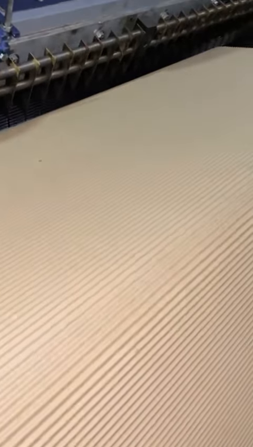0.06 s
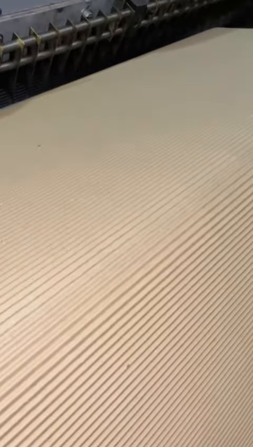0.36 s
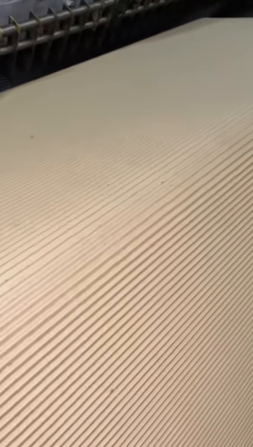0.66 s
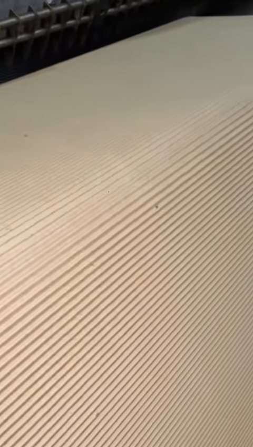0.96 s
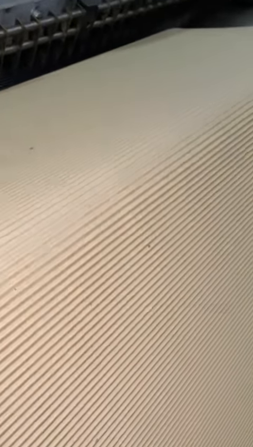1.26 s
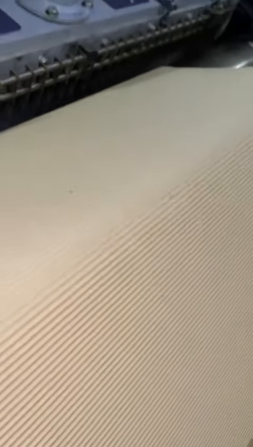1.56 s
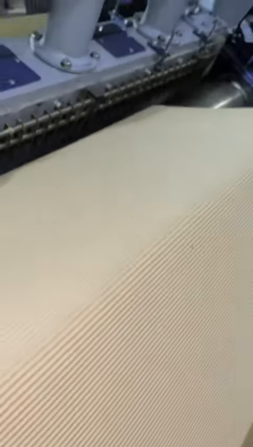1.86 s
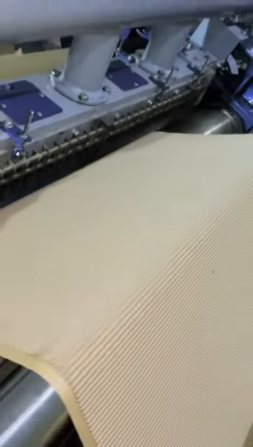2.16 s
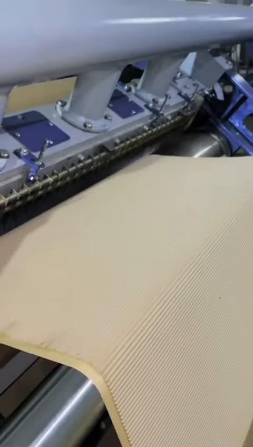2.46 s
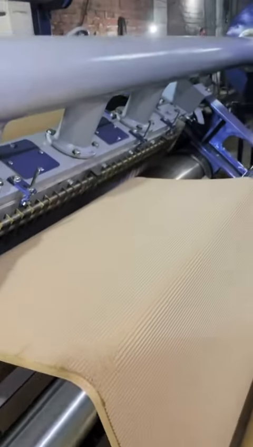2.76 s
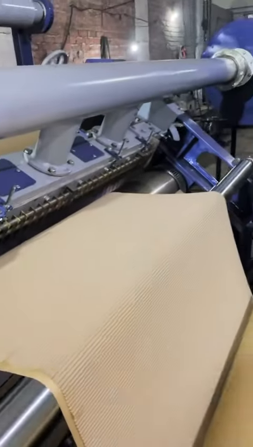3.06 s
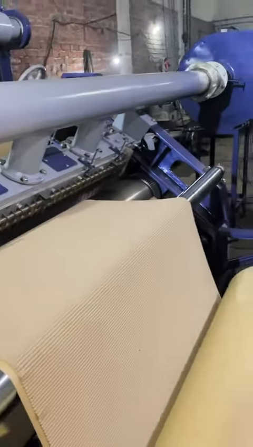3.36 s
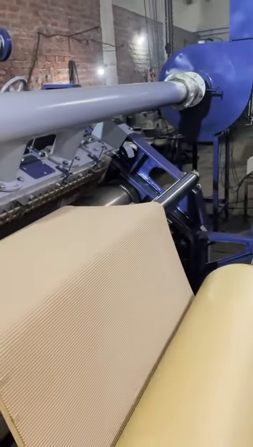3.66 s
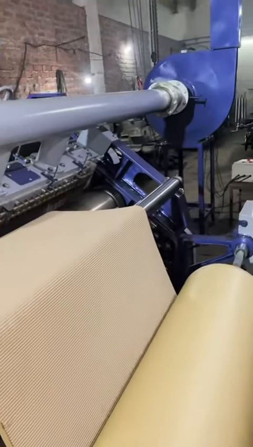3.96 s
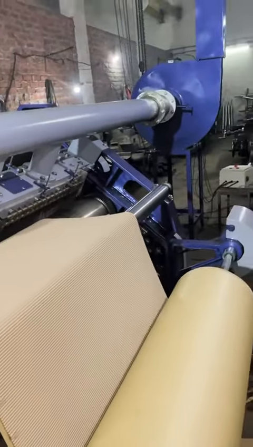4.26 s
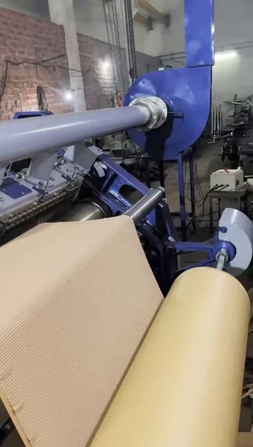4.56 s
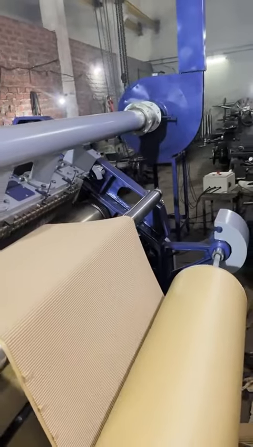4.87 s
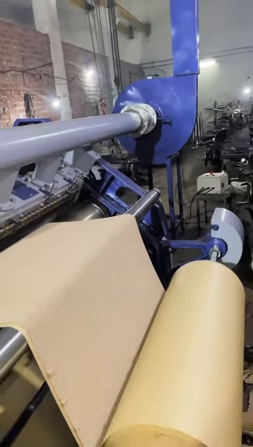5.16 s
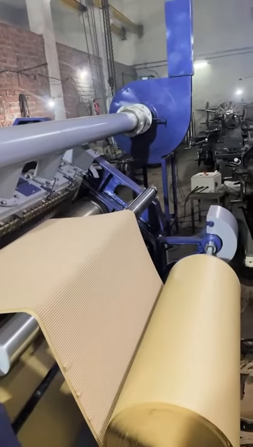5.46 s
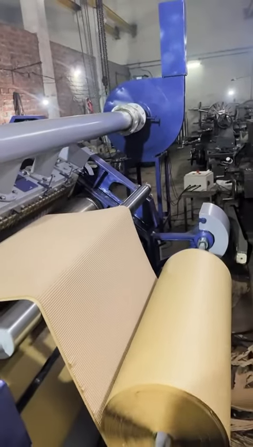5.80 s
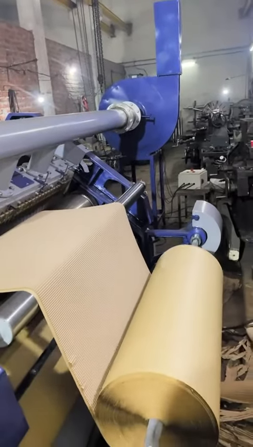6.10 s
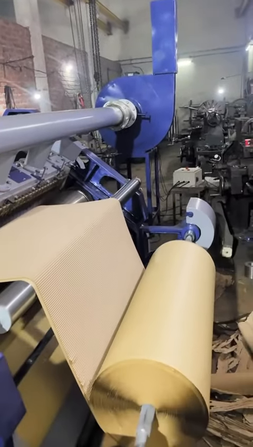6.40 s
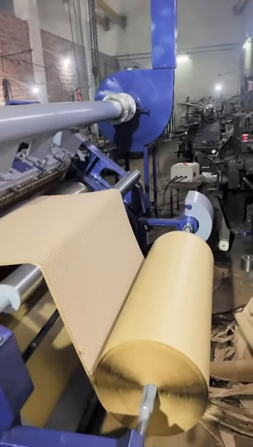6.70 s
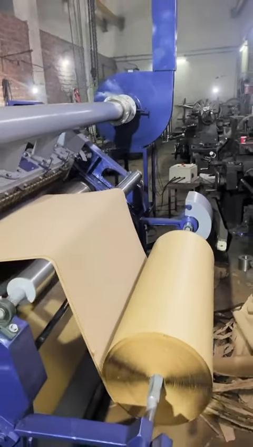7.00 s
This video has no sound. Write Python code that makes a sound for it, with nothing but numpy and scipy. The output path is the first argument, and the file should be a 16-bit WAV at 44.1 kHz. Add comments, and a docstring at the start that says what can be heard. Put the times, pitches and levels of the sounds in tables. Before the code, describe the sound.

A paper corrugating machine runs steadily, with hissing air and rapid high chirps over a rumbling frame, churning gears and motor hum.

```python
"""A paper corrugator runs in a workshop. From the start, air hisses through its suction slots, with a
dipping chirp each time a flute (a ridge on the roll) passes, 19 a second. The paper scrapes now and
then, over a rumbling frame, churning gears and a humming motor. After about 1.5 seconds the microphone
backs away: the hiss and chirps soften, and the suction blower's thin tone swells. In the last second
the microphone comes a little closer again."""
import sys
import numpy as np
from scipy.fft import rfft, irfft, next_fast_len
from scipy.io import wavfile
from scipy.ndimage import uniform_filter1d, map_coordinates

SR = 44100
rng = np.random.default_rng(int(sys.argv[2]) if len(sys.argv) > 2 else 0)


def generate_wav(sig):
    """Save sig (samples, or channels by samples) to the path in sys.argv[1] as 16-bit PCM at SR."""
    pcm = np.round(np.clip(np.atleast_2d(sig).T, -1, 1) * 32767).astype(np.int16)
    wavfile.write(sys.argv[1], SR, pcm)


N = 314874

# How far the microphone is from the rolls. Each row: time in seconds, distance in metres.
MIC_DISTANCE = [(0, 0.6), (1.45, 0.65), (2.3, 1.06), (3.4, 1.37), (4.8, 1.56), (6.2, 1.63), (7.14, 1.38)]
# The blower's tone swells where the machine does not block it. Each row: time in seconds, level in dB.
BLOWER_LEVEL = [(0, -53.5), (1.5, -58.5), (1.75, -46), (2.5, -45), (2.95, -45.5), (3.15, -53), (3.4, -49),
                (3.95, -53.5), (4.6, -53.5), (5.1, -52.5), (5.7, -49.5), (6.45, -52), (6.95, -46.5)]

SEALED_AT = .64  # how far through its cycle a flute seals the slot
# Sounds have two rows: what arrives straight from the source, and what fills the hall.
DIRECT_ONLY = np.array([[1], [0]])


def amp(db):
    """Turn decibels into a gain."""
    return 10 ** (np.asarray(db) / 20)


def unit(x):
    """Scale a sound to an average (rms) level of 1."""
    return x / np.sqrt(np.mean(x ** 2) + 1e-20)


def along(points, hz):
    """Read a table of frequencies and values at hz, on a log frequency scale."""
    freqs, values = np.transpose(points)
    return np.interp(np.log(hz + 1), np.log(freqs + 1), values)


def curve(rows):
    """Join rows of time and value with straight lines, giving one value per sample."""
    seconds, values = np.transpose(rows)
    return np.interp(np.arange(N) / SR, seconds, values)


def wobble(rate):
    """A smooth curve through rate random points a second."""
    return map_coordinates(rng.standard_normal(int(N * rate / SR) + 4), [np.arange(N) * rate / SR])


def filtered(x, response):
    """Multiply each frequency in x by response(hz)."""
    size = next_fast_len(N + SR // 2)
    return irfft(rfft(x, size) * response(np.fft.rfftfreq(size, 1 / SR)), size)[..., :N]


def rush(spectrum):
    """Two unrelated noises with this spectrum: one direct, one filling the hall."""
    return unit(filtered(rng.standard_normal((2, N)), lambda hz: amp(along(spectrum, hz))))


def tone(hz, waver_db, drift):
    """The tone of a turning part; its level wavers and its phase drifts (in radians)."""
    phase = 2 * np.pi * hz * np.arange(N) / SR + drift * wobble(3.19)
    return unit(amp(waver_db * wobble(3.93)) * np.sin(phase))


def whistle(centre_hz, width_hz):
    """Noise in a narrow resonance around a steady or moving pitch."""
    a, b = filtered(rng.standard_normal((2, 2, N)), lambda hz: (1 + (hz / width_hz) ** 2) ** -.75)
    phase = 2 * np.pi * np.cumsum(np.full(N, centre_hz)) / SR
    return unit(a * np.cos(phase) + b * np.sin(phase))


def burst(cycle, centre, length):
    """A flat-topped swell once a cycle; centre and length are fractions of the cycle."""
    away = (cycle - centre + .5) % 1 - .5
    return 1 / np.sqrt(1 + (2 * away / length) ** 8)


def level(db_at_1m, per_doubling_db, swell_db=0, blocked=0):
    """Gain that falls with distance; it can swell at random and share part of the blower's blocking."""
    blower_db = curve(BLOWER_LEVEL)
    distance_db = per_doubling_db * np.log2(curve(MIC_DISTANCE))
    blocking_db = blocked * (blower_db - blower_db.mean())
    return amp(db_at_1m + distance_db + blocking_db + swell_db * wobble(4.1))


def floor_rumble():
    """The floor rumbles deeply under the machine."""
    # The rumble's spectrum. Each row: frequency in Hz, relative level in dB.
    spectrum = [(20, -25), (33, -18.5), (41, -6), (65, -1.5), (86, -4), (97, 4.5), (112, 2), (140, -18),
                (250, -45.5)]
    return level(-45, per_doubling_db=-3, blocked=.2) * rush(spectrum)


def motor():
    """The drive motor hums, buzzes about an octave higher, and turns shafts with wavering tones."""
    # The shafts' tones. Each row: pitch in Hz, level in dB.
    shaft_tones = [(117, -57.5), (139, -46), (147.5, -46.5), (158, -48), (172.8, -50), (223, -53),
                   (263, -48), (283, -48), (331, -50.5), (434, -55.5)]
    hum = amp(-47) * tone(49.15, waver_db=.8, drift=.1)
    buzz = level(-52.5, per_doubling_db=-5.5) * tone(99.3, waver_db=2, drift=1.3)
    shafts = sum(amp(db) * tone(hz, waver_db=2.5, drift=.67) for hz, db in shaft_tones)
    return (hum + buzz + shafts) * DIRECT_ONLY


def blower():
    """The blower's blades make a thin tone that also fills the hall, and its casing rings."""
    level_db = curve(BLOWER_LEVEL)
    flutter = unit(amp(3.5 * wobble(36)))  # air flows in unevenly
    blades = amp(level_db) * flutter * tone(591.3, waver_db=-1.5, drift=.8)
    casing = amp(level_db - 3) * whistle(828, width_hz=30)
    return blades * np.array([[1], [-.9]]) + casing


def duct():
    """The air duct gives a low drone that swells and fades."""
    # The drone's loudness. Each row: time in seconds, level in dB.
    loudness = [(0, -44), (0.4, -38), (0.8, -44.5), (1.03, -34), (1.38, -39), (1.6, -43.5), (1.95, -37),
                (2.75, -35.5), (3.1, -43), (3.6, -37.5), (4.7, -42.5), (5.2, -37), (5.5, -42.5), (6, -33.5),
                (6.45, -39.5), (7, -36.5)]
    # Its spectrum. Each row: frequency in Hz, relative level in dB.
    spectrum = [(70, -46.5), (110, -21), (126, -7.5), (134, 2), (152, 2), (168, -8.5), (190, -15),
                (260, -28.5), (600, -79)]
    return amp(curve(loudness)) * rush(spectrum)


def gears():
    """The gears churn, and their teeth add narrow tones."""
    # The gears come out from behind the paper. Each row: time in seconds, level in dB.
    loudness = [(0, -41.5), (2, -42), (3.7, -38.5), (5.1, -41), (5.9, -38), (6.5, -36.5), (7.14, -39.5)]
    # The churn's spectrum. Each row: frequency in Hz, relative level in dB.
    churn = [(200, -33), (345, -5.5), (388, 4), (415, -3), (455, 0.5), (485, 1.5), (525, 0.5), (565, -5),
             (700, -29.5), (1500, -63.5)]
    # The teeth's tones. Each row: pitch in Hz, level in dB compared with the churn.
    tooth_tones = [(365, -11.5), (397, -9), (476, -14), (503, -16)]
    teeth = sum(amp(db) * whistle(hz, width_hz=2.2) for hz, db in tooth_tones)
    return amp(curve(loudness)) * unit(rush(churn) + teeth)


def frame():
    """The machine's frame rumbles almost steadily."""
    # The rumble's loudness. Each row: time in seconds, level in dB.
    loudness = [(0, -32.5), (0.5, -34.5), (1.4, -34.5), (1.75, -33), (2.1, -35), (2.5, -33.5), (2.8, -35.5),
                (3.8, -35.5), (4.25, -36.5), (4.9, -36.5), (5.2, -34.5), (6.2, -35), (7.14, -35)]
    # Its spectrum. Each row: frequency in Hz, relative level in dB.
    spectrum = [(100, -31), (175, -3), (225, -4), (268, 1), (295, -1), (328, -1.5), (348, -8), (420, -22),
                (600, -26.5), (1500, -80)]
    return amp(curve(loudness)) * rush(spectrum)


def rolls():
    """The fluted rolls make a broad rushing noise as they mesh."""
    # The rush's spectrum. Each row: frequency in Hz, relative level in dB.
    spectrum = [(250, -11), (520, -10.5), (660, 1), (740, -1.5), (820, -1), (1050, -5.5), (1500, -8.5),
                (2100, -8), (4000, -16), (12000, -34.5)]
    return level(-37.5, per_doubling_db=-1.3, blocked=.13) * rush(spectrum)


def paper_scrapes(half_length_s=.009, rough_radians=.55):
    """Now and then the paper catches and rings briefly and roughly."""
    # The scrapes. Each row: time of the peak in seconds, pitch in Hz, peak level in dB.
    catches = [(0.369, 3290, -34), (0.682, 4120, -32.5), (0.787, 3510, -28.5), (0.834, 3600, -26.5),
               (1.418, 4249, -33), (1.628, 3158, -33), (3.394, 3050, -34), (3.83, 4130, -35),
               (3.91, 4260, -37), (4.329, 3230, -39.5), (4.39, 4090, -34), (6.425, 4120, -35),
               (6.676, 3350, -34)]
    t = np.arange(N) / SR
    sound = np.zeros(N)
    for peak_s, hz, db in catches:
        near = np.abs(t - peak_s) < 3 * half_length_s
        offset_s = t[near] - peak_s
        jitter = unit(uniform_filter1d(rng.standard_normal(len(offset_s)), size=90))
        phase = 2 * np.pi * hz * offset_s + rough_radians * jitter
        sound[near] += amp(db) * np.exp(-(offset_s / half_length_s) ** 2) * np.sin(phase)
    return sound * DIRECT_ONLY


def paper_rub(press):
    """Paper fizzes against the roll, loudest when pressed hardest."""
    # The fizz's spectrum. Each row: frequency in Hz, relative level in dB.
    spectrum = [(3000, -43), (6000, 1.5), (7700, 7.5), (9000, 4), (10200, 4.5), (11400, -9), (11850, -18.5)]
    return level(-33, per_doubling_db=-6, swell_db=-.5) * amp(4.5 * press) * rush(spectrum)


def slot_leak(press, gap):
    """Air hisses through the slots, less under pressure; a reopened slot adds a rasp heard close by."""
    # The hiss's spectrum. Each row: frequency in Hz, relative level in dB.
    spectrum = [(600, -39.5), (1300, -8.5), (1950, -17.5), (2450, -5.5), (2900, -5), (3500, -1.15),
                (3800, -1), (4150, 0.6), (4500, -1.2), (5400, -2), (6500, 1.5), (8000, -8.5), (12000, -8)]
    leak_db = -1.18 * press
    hiss = level(-29.5, per_doubling_db=-4.5) * amp(leak_db + .3 * gap) * rush(spectrum)
    rasp = level(-48, per_doubling_db=-14) * amp(2 * (leak_db + gap)) * whistle(3540, width_hz=270)
    return hiss + rasp


def slot_pipe(cycle):
    """The nearest slot pipes thinly at every seal."""
    return level(-42.5, per_doubling_db=-12) * burst(cycle, SEALED_AT, .38) * whistle(6700, width_hz=45)


def slot_chirp(flute, cycle, strength, size):
    """A slot's resonances sound in turn, sagging as a flute seals it and rising as it reopens."""
    # The resonances. Each row: pitch in Hz when sealed and heard from 1 m, width in Hz,
    # relative level in dB, then centre and length as fractions of the cycle.
    resonances = [(6620, 280, -7, .39, .34), (6055, 205, 0, .645, .35), (5400, 240, -9, .655, .15)]
    # How firmly the flutes seal. Each row: time in seconds, relative chirp level in dB.
    firmness = [(0, -0.5), (1.3, -1.5), (1.8, 0.5), (2.25, -0.5), (2.45, 0.5), (3.2, 1), (3.37, 3.5),
                (3.5, 0.5), (4.7, 1), (4.97, 3), (5.15, 0.5), (5.45, 0.5), (6.55, 1), (6.78, 1.5),
                (7.14, 0)]
    alternate_db = 1.4 * (flute % 2 - .5)  # every second flute seals harder
    force_db = curve(firmness) + .6 * strength + alternate_db
    opening = np.minimum(np.abs(cycle - SEALED_AT) / .24, 1)  # 0 is sealed, 1 is open
    closeness = -np.log2(curve(MIC_DISTANCE))  # close to the slots the chirp is brighter
    pitch = 1 + .06 * opening + .013 * size + .023 * closeness
    ringing = sum(amp(db) * burst(cycle, centre, length) * whistle(hz * pitch, width_hz)
                  for hz, width_hz, db, centre, length in resonances)
    return level(-34, per_doubling_db=-3.5) * unit(amp(force_db) * ringing)


def passing_flutes():
    """Each flute presses the paper and seals a suction slot, and no two seal alike."""
    # The speed of the rolls. Each row: time in seconds, flutes passing per second.
    speed = [(0, 19.05), (1.3, 19.14), (2, 19.26), (4.5, 19.13), (7.14, 19.08)]
    passed = np.cumsum(curve(speed)) / SR + .952
    flute, cycle = passed.astype(int), passed % 1  # which flute, and how far it has got from 0 to 1
    strength, size, gap = rng.standard_normal((flute.max() + 1, 3))[flute].T
    press = np.cos(2 * np.pi * (cycle - .46))  # hardest just before mid-cycle
    chirp = slot_chirp(flute, cycle, strength, size)
    return chirp + slot_pipe(cycle) + slot_leak(press, gap) + paper_rub(press)


def microphone(direct, hall):
    """Two close openings pick up the sound; their sum and difference give left and right."""
    # How strong the sum is. Each row: frequency in Hz, gain in dB.
    sum_gain = [(4400, 0), (4700, -1.5), (4900, -6), (5150, 2), (5500, 2.5), (7600, -2.5), (8200, -19)]
    # How strong the difference is. Each row: frequency in Hz, gain in dB.
    difference_gain = [(60, -30), (300, -16.5), (520, -5.5), (900, -5), (1600, -9), (1880, -21),
                       (2350, -2.5), (3300, -3), (3900, -8.5), (4700, 0), (5100, -4), (5460, -28),
                       (6100, -7), (7300, -1.5), (9000, 0)]
    # The stereo balance. Each row: frequency in Hz, left minus right in dB.
    balance = [(70, 0), (130, -1.7), (220, -3.7), (380, -4.3), (600, -1.2), (1000, .6), (3000, .2),
               (6000, 0)]
    # How directional the sound is. Each row: frequency in Hz, share arriving from one side.
    one_sided = [(200, .05), (900, .4), (1800, .15), (2500, .6), (3500, .4), (4400, .45), (5200, 0.29),
                 (6200, .68), (8000, .5)]
    ahead = filtered(direct, lambda hz: 1j * along(one_sided, hz))  # 1j: a quarter cycle ahead
    around = filtered(hall, lambda hz: np.sqrt(1 - along(one_sided, hz) ** 2))
    lean = filtered(direct, lambda hz: (amp(along(balance, hz)) - 1) / (amp(along(balance, hz)) + 1))
    side = filtered(ahead + around, lambda hz: amp(along(difference_gain, hz))) + lean
    mid = filtered(direct, lambda hz: amp(along(sum_gain, hz)))
    return np.array([mid + side, mid - side])


def scene():
    """All parts of the corrugator run at once and reach the microphone."""
    foreground = passing_flutes() + paper_scrapes()
    background = duct() + frame() + gears() + rolls() + motor() + blower() + floor_rumble()
    direct, hall = foreground + background
    return microphone(direct, hall)


def record(dry, mid_top_hz=8280, top_hz=11850):
    """Cut the highest treble; the stereo centre ends lower than the sides."""
    mid = filtered((dry[0] + dry[1]) / 2, lambda hz: hz < mid_top_hz)
    side = (dry[0] - dry[1]) / 2
    return filtered(np.array([mid + side, mid - side]), lambda hz: hz < top_hz)


dry = scene()
out = record(dry)
generate_wav(out)
```